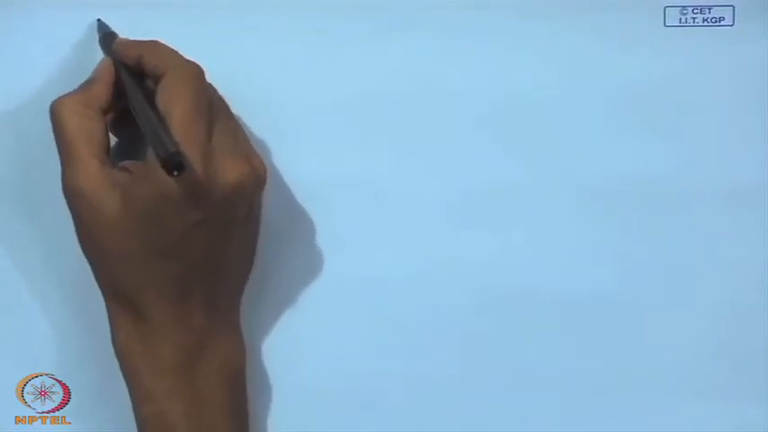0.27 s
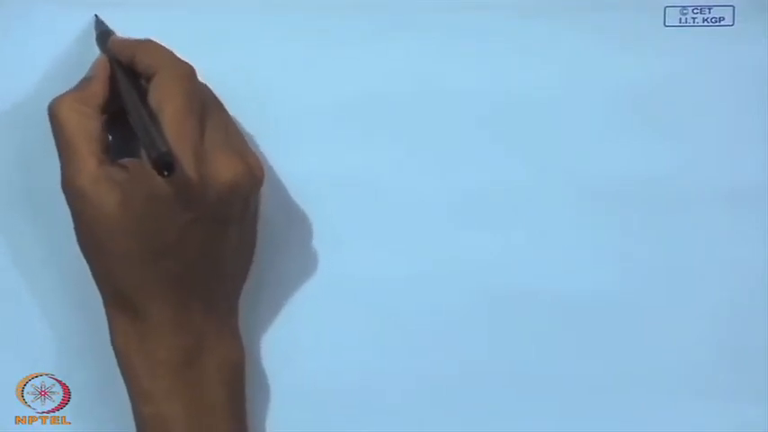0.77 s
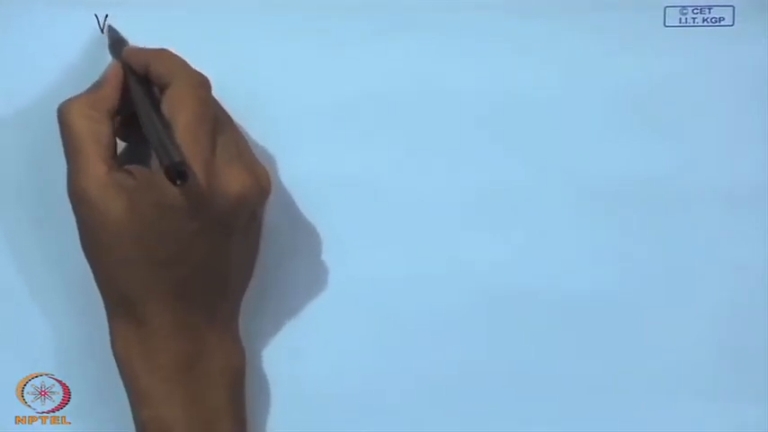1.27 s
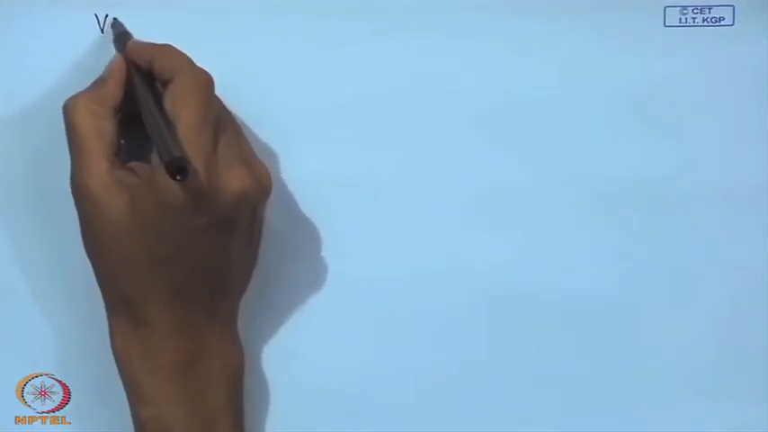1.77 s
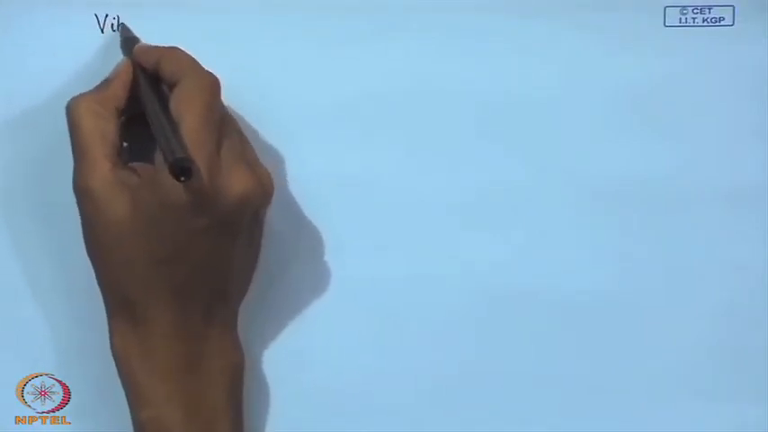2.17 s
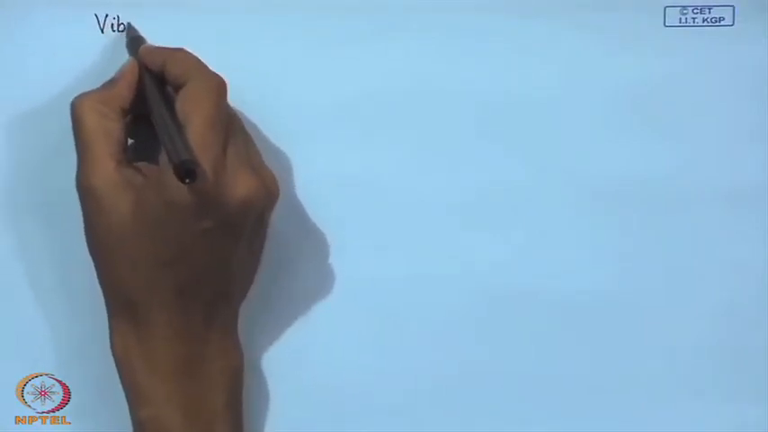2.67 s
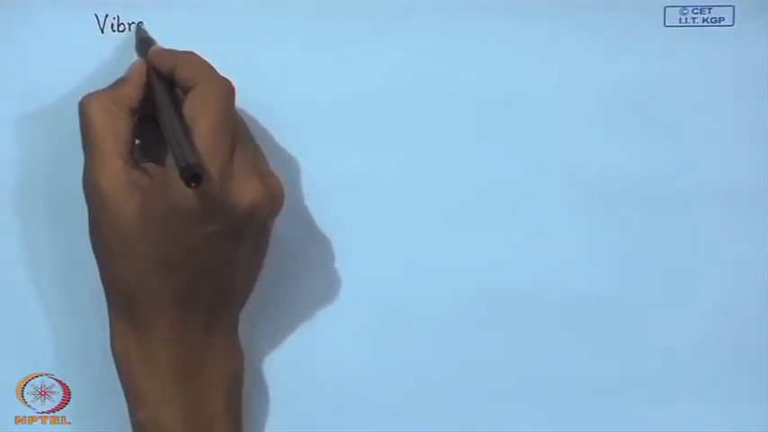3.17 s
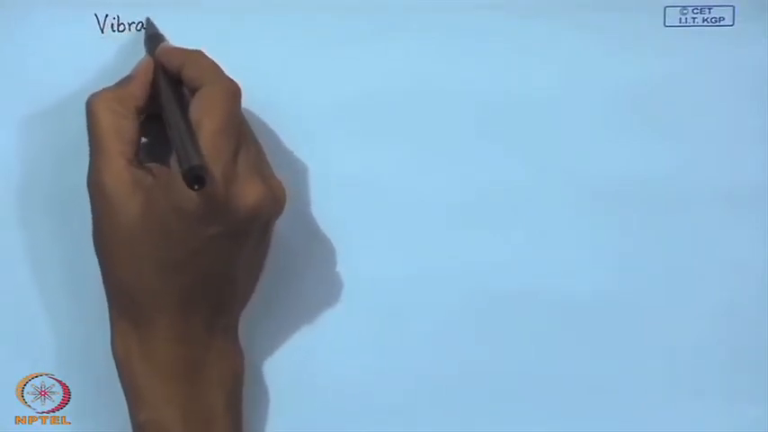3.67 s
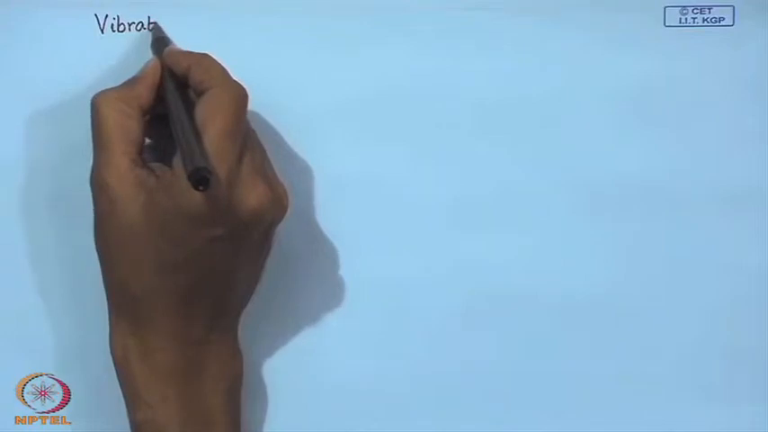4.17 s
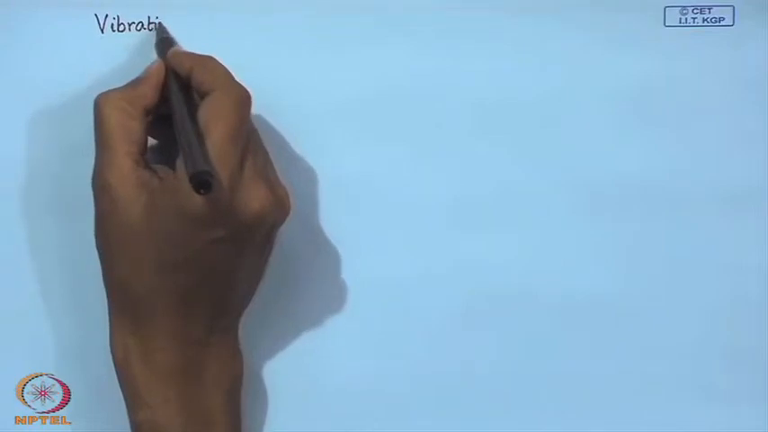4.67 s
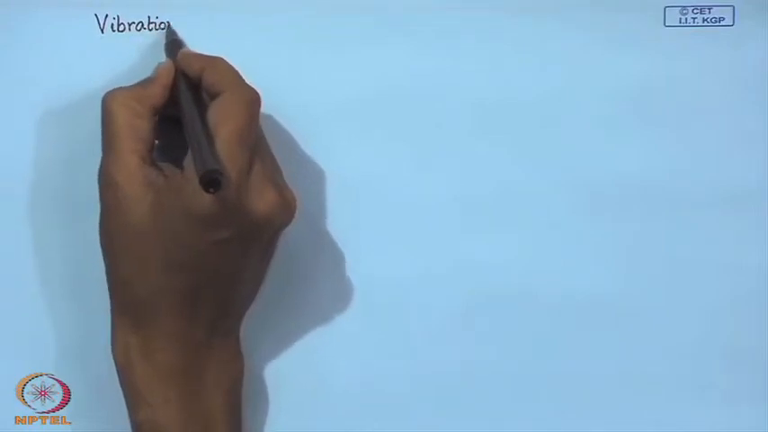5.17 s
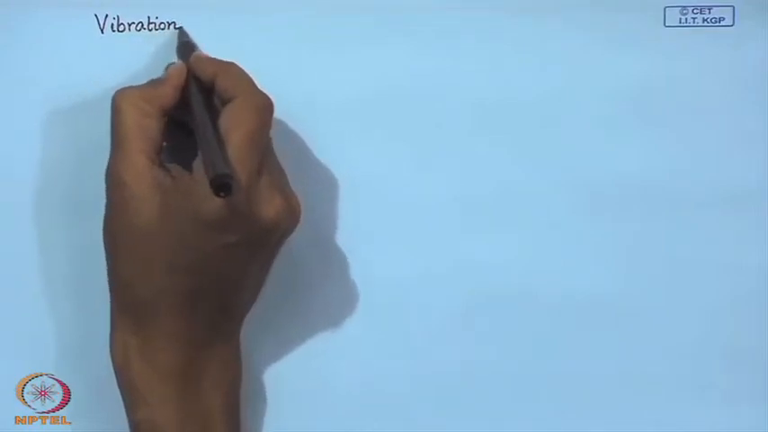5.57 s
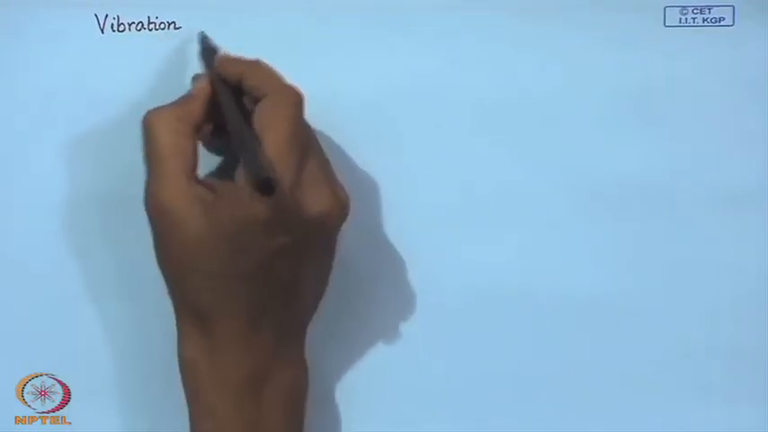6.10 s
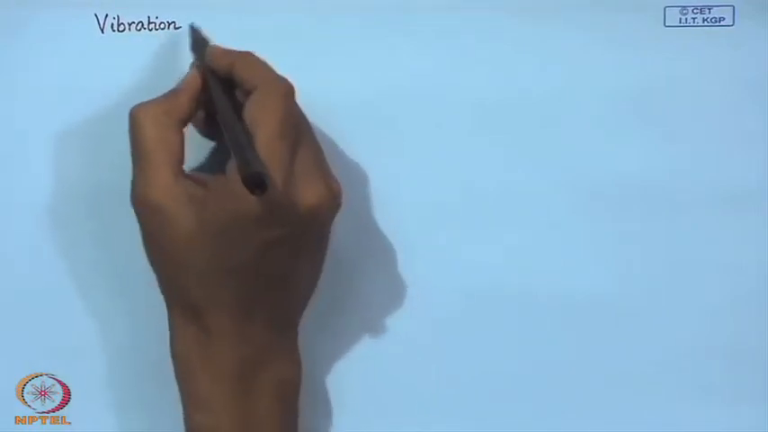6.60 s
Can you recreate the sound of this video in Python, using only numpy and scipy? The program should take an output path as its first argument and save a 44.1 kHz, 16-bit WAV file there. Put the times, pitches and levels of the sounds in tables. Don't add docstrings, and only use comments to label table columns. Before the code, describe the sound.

Quiet room with heavy low ventilation rumble; soft dry pen strokes whisper on a sheet, then the hand rustles and the paper snaps.

```python
import sys
import numpy as np
from scipy import signal
from scipy.fft import rfft, irfft
from scipy.io import wavfile
from scipy.ndimage import uniform_filter1d

SR = 44100
rng = np.random.default_rng(int(sys.argv[2]) if len(sys.argv) > 2 else 0)


def to_wav(sig):
    pcm = np.clip(np.atleast_2d(sig), -1, 1) * 32767
    pcm = np.round(pcm).astype(np.int16)
    wavfile.write(sys.argv[1], SR, pcm.T)


def how_loud(loudness_db):
    steps = np.asarray(loudness_db, float) / 20
    return 10 ** steps


N = 301644

# f/Hz, density/dB
AIR_SPECTRUM = [(60, 0), (72, -5), (86, -17), (110, -23.5), (130, -30.5), (250, -28), (340, -37.5),
                (460, -36), (700, -43), (900, -67)]
# f/Hz, width/Hz, level/dB
DUCT_MODES = [(81.6, 11.3, -61.5), (120.8, 7.3, -66.5), (167.1, 11, -66), (195.9, 10, -69.5),
              (307, 20, -73), (448.4, 25, -75.5), (512, 24, -87), (676, 13, -86), (864, 9.6, -89.5),
              (979, 12, -86.5), (1220, 180, -82.5)]
# t/s, level/dB
THROB = [(0, -32.5), (0.28, -29), (0.78, -35), (1.1, -26.5), (1.39, -39), (1.58, -27), (1.79, -26.5),
         (2.15, -34.5), (2.5, -24.5), (2.86, -31), (3.27, -24.5), (3.56, -38), (3.71, -31), (4.48, -39),
         (4.7, -30.5), (5.9, -33), (6.55, -38), (6.84, -35)]
# f/Hz, width/Hz
RUMBLE_MODES = [
    (37, 8.53),
    (58.5, 6.9),
]
# t/s, level/dB
GUSTS_SECOND = [(0.0, -28.5), (0.39, -29), (1.12, -28.5), (1.81, -30.5), (2.21, -31), (2.42, -29.5),
                (2.75, -40.5), (3.1, -30.5), (3.45, -33.5), (3.8, -31), (4.04, -32), (4.23, -32),
                (4.46, -28.5), (4.8, -31.5), (5.11, -29.5), (5.58, -32.5), (5.95, -31.5), (6.13, -30.5),
                (6.65, -33.5)]
# t/s, level/dB
GUSTS_THIRD = [(0.3, -40.5), (0.88, -38), (1.27, -38), (1.69, -38), (2.02, -39), (2.42, -36), (2.8, -43.5),
               (3.2, -41), (3.73, -37), (4.0, -38), (4.3, -37.5), (4.5, -47), (5.03, -40.5), (5.36, -38),
               (5.92, -46), (6.27, -36.5), (6.62, -35)]
# t/s, level/dB, hold/s, f/Hz, glide/(Hz per s)
SQUEAKS = [
    (1.535, -69.5, .032, 1455, 300),
    (1.68, -73.5, .022, 1450, -100),
    (1.562, -72, 0.074, 1270, 600.5),
    (1.752, -78, .008, 1710, 900),
    (3.72, -82, .04, 2038, 30),
    (3.9, -86, .04, 2025, 30.5),
]
# t/s, peak level/dB, crack f/Hz, thump re crack/dB
SNAPS = [(1.111, -57, 7000, -17), (1.1365, -61, 7000, -14), (1.7544, -64, 6000, -8),
         (5.5344, -53, 9800, -12), (5.5495, -52, 11300, -14), (5.697, -55, 8200, -14),
         (5.718, -54, 4000, -18), (5.7235, -55, 6500, -1), (5.7284, -39, 13000, -18),
         (5.7345, -39.5, 8500, -21), (5.8117, -63, 9000, -8), (5.9958, -55, 11000, -18),
         (6.2188, -49, 5000, -19), (6.4794, -65, 9000, -8), (6.6925, -58, 5200, -12)]
# t/s, level/dB, rise/s, fall/s, hold/s
SLIDES = [
    (5.716, -63, 0.081, .03, 0.0039),
    (5.726, -55.5, .02, .004, 0.0083),
    (5.74, -72, .02, .11, .066),
    (6.214, -71.5, .11, .05, 0.0053),
    (6.23, -77, .2, .13, 0.042),
    (6.544, -78, .035, .045, 0),
    (6.69, -86, 0.14, .17, 0),
]
# f/Hz, density/dB
RUSTLE_SPECTRUM = [(900, -22), (1300, -1), (1700, -8), (2200, -14), (4000, -9), (7200, -8.5), (9300, -8),
                   (11000, -5.5), (13600, -11), (15200, -9), (16000, -9)]
# t/s, level/dB, rise/s, fall/s, lean/dB (more barrel when the pen lies flatter)
FLICKS = [(0.845, -66, 0.04, 0.091, 4), (1.199, -71.5, .03, .02, -1.5), (1.43, -70, 0.024, .05, .6),
          (1.623, -69.5, .028, 0.042, -2.5), (2.182, -65, .06, 0.078, -1), (2.694, -70.5, .025, 0.07, 1),
          (3.102, -78.5, 0.033, .12, .6), (3.482, -75, .018, .06, -1), (3.538, -70.5, .022, 0.03, -3.5),
          (3.804, -67, 0.053, .08, 3), (4.114, -61, 0.023, 0.022, -0.5), (4.298, -73.5, 0.053, .045, 3),
          (4.372, -65, .018, 0.014, -1.5), (4.576, -66, 0.011, 0.01, -2.5), (4.901, -63.5, 0.083, 0.047, 2),
          (4.961, -68.5, .03, 0.019, -3), (5.461, -76, 0.066, .06, 1.5), (1.106, -66, .05, 0.048, -0.5),
          (3.32, -71.5, .015, 0.18, 0)]
# t/s, level/dB, rise/s, fall/s, hold/s
LOOPS = [(1.036, -60.5, .02, 0.056, .036), (1.53, -71, 0.026, .047, .02), (1.977, -62, 0.019, 0.044, 0.027),
         (2.326, -66, 0.077, .022, 0.036), (2.801, -67, .021, .04, .052), (3.197, -65, 0.022, 0.049, 0.049),
         (3.359, -67, .04, .025, .028), (3.915, -68.5, 0.038, 0.021, 0.023), (4.772, -73, .02, .08, .025),
         (5.173, -75.5, .025, 0.023, .03), (5.336, -70, 0.052, .026, .052),
         (5.539, -61.5, .009, 0.031, 0.017)]
# t/s, desk level/dB, rise/s, fall/s
PRESSES = [
    (0.88, -67.5, .15, 0.22),
    (1.1, -74, .15, .15),
    (2.35, -70, .15, .1),
    (2.82, -67, .12, 0.17),
    (3.29, -73, .2, .2),
    (3.85, -67.5, .15, .08),
    (4.3, -71, .1, .15),
    (4.94, -70, .1, .1),
    (5.46, -72, .1, .1),
    (5.538, -72, .02, .08),
]
# f/Hz, width/Hz, level/dB
BARREL_LOW = [(3020, 1350, -4), (4190, 600, -8), (5040, 770, -0.5), (5960, 930, -2.5), (6990, 690, -4.5),
              (8340, 1470, -2)]
# f/Hz, width/Hz, level/dB
BARREL_HIGH = [(8710, 760, -6), (9690, 910, 0), (11010, 460, 0), (11720, 640, 0)]
# f/Hz, width/Hz, level/dB
TIP_MODES = [(13250, 1100, 3), (14700, 840, -11), (15700, 1200, -19)]
# f/Hz, width/Hz, level/dB
DESK_MODES = [(1238, 160, 4.5), (1377, 350, -13.5), (1099, 120, 5), (1650, 730, -12)]
# f/Hz, density/dB
HISS_SPECTRUM = [(500, 4.5), (800, 5.5), (1000, 1.5), (1300, -3), (1600, -8), (2000, -9), (2500, -14.5),
                 (3200, -14), (4000, -23.5), (5000, -20.5), (6300, -42), (10000, -20.5), (14500, -28.5),
                 (16000, -29)]
# f/Hz, level/dB
HUM = [(100, -57.5), (247.6, -74), (585, -80.5), (12096, -100), (14416, -101)]

SWELL_DB = 20
GRIP_DB = 1.5


def unit_power(x):
    return x / np.sqrt(np.mean(x ** 2) + 1e-20)


def colour(x, spectrum, low_hz):
    hz = np.arange(N // 2 + 1) * SR / N + 1e-3
    spectrum_hz, spectrum_db = np.transpose(spectrum)
    db = np.interp(np.log(hz), np.log(spectrum_hz), spectrum_db)
    low_cut = 1 + (low_hz / hz) ** 12
    return unit_power(irfft(rfft(x) * how_loud(db) / low_cut, N))


def resonate(x, hz, width_hz):
    r = np.exp(-np.pi * width_hz / SR)
    feed = (1 - r * r) / 2 * np.array([1, 0, -1])
    return signal.lfilter(feed, [1, -2 * r * np.cos(2 * np.pi * hz / SR), r * r], x)


def resonate_steep(x, hz, width_hz):
    return resonate(resonate(x, hz, width_hz), hz, width_hz)


def drift(rate_hz):
    knots = rng.standard_normal(round(N / SR * 40) + 2)
    r = np.exp(-2 * np.pi * rate_hz / 40)
    slow = unit_power(signal.lfilter([1], [1, -r], knots))
    return np.interp(np.arange(N) / SR * 40, np.arange(len(slow)), slow)


def body(x, modes):
    rings = [how_loud(db) * unit_power(resonate_steep(x, hz, width)) * np.sqrt(width)
             for hz, width, db in modes]
    total = np.sqrt(sum(np.mean(ring ** 2) for ring in rings))
    return sum((-1) ** k * how_loud(GRIP_DB * drift(4)) * ring for k, ring in enumerate(rings)) / total


def grains(per_s, spread_db):
    sizes = how_loud(spread_db * np.minimum(rng.exponential(1, N), 5)) * rng.choice([-1, 1], N)
    return sizes * (rng.random(N) < per_s / SR)


def tone(hz):
    phase = 2 * np.pi * np.cumsum(hz * np.ones(N)) / SR
    return np.sqrt(2) * np.sin(phase + rng.uniform(0, 2 * np.pi))


def fine(per_ms):
    return np.interp(np.arange(N) / SR * 1000, np.arange(len(per_ms)), per_ms)


def swell(s, db, rise, fall, hold=0):
    t = np.arange(0, N / SR + 1, 1e-3) - s
    return db - SWELL_DB * np.maximum(np.maximum(-t / rise, (t - hold) / fall), 0)


def loudest(rows):
    return fine(np.max([swell(*row) for row in rows], axis=0))


def air():
    sway = how_loud(-40) * unit_power(resonate_steep(rng.standard_normal(N), 17, 7))
    rush_db = -51 + 1.64 * drift(4.7)
    rush = how_loud(rush_db) * colour(rng.standard_normal(N), AIR_SPECTRUM, low_hz=64.8)
    ducts = sum(how_loud(db) * unit_power(resonate(rng.standard_normal(N), hz, width))
                for hz, width, db in DUCT_MODES)
    return rush + ducts + sway


def room_modes():
    throb_hz, wander_hz = 27.8, 0.59
    gust_rise_s, gust_fall_s = 0.43, 0.48
    throb_s, throb_db = np.transpose(THROB)
    throb_level_db = np.interp(np.arange(N) / SR, throb_s, throb_db)
    out = how_loud(throb_level_db) * tone(throb_hz + wander_hz * drift(2.36))
    for (hz, width_hz), gusts in zip(RUMBLE_MODES, [GUSTS_SECOND, GUSTS_THIRD]):
        mode = resonate_steep(rng.standard_normal(N), hz, width_hz)
        power = uniform_filter1d(uniform_filter1d(mode ** 2, size=5000), size=5000)
        gust_db = loudest([(s, db, gust_rise_s, gust_fall_s) for s, db in gusts])
        out = out + how_loud(gust_db) * mode / np.sqrt(power)
    return out


def squeaks():
    rise_s, fall_s = 0.035, 0.035
    rough = 1 + 0.45 * unit_power(resonate(rng.standard_normal(N), 40, 65))
    t = np.arange(N) / SR
    tones = 0
    for s, db, hold, hz, glide in SQUEAKS:
        level_db = fine(swell(s, db, rise_s, fall_s, hold))
        tones = tones + how_loud(level_db) * tone(hz + glide * (t - s))
    return rough * tones


def snaps():
    out, t = np.zeros(N + 1000), np.arange(1000) / SR
    knock = np.sin(2 * np.pi * 1580 * t) + 0.64 * np.sin(2 * np.pi * 1250 * t)
    thump = knock * 2.5 * (t / .002) * np.exp(-t / .002)
    for s, db, hz, thump_db in SNAPS:
        burst = rng.standard_normal(1000) * np.exp(-t / .00015)
        burst[12:] += .7 * burst[:-12]
        crack = .5 * np.diff(burst, prepend=0) + resonate(burst, hz, 3500) * 1.5
        snap = crack / np.abs(crack).max() + how_loud(thump_db) * thump
        out[round(s * SR):][:1000] += how_loud(db) * snap
    return out[:N]


def hand():
    return how_loud(loudest(SLIDES)) * colour(grains(6800, spread_db=2.5), RUSTLE_SPECTRUM, low_hz=1194.6)


def pen():
    low_db, tip_db = -6.5, -7.5
    low_follows, desk_follows = 0.83, 0.34
    press_db, desk_usual_db = -67, -73
    catch_db = 1.3
    level_db = loudest([row[:4] for row in FLICKS] + LOOPS)
    leaning_db = loudest([(s, db + lean, rise, fall) for s, db, rise, fall, lean in FLICKS] + LOOPS)
    slips = grains(7500, spread_db=3.3) * how_loud(catch_db * drift(15))
    high_power = np.clip(1 - how_loud(2 * low_db) - how_loud(2 * tip_db), .1, 1)
    high = body(slips, BARREL_HIGH) * np.sqrt(high_power)
    low_level_db = low_db + press_db + low_follows * (leaning_db - press_db)
    low = how_loud(low_level_db) * body(slips, BARREL_LOW)
    tip = how_loud(tip_db) * body(slips, TIP_MODES)
    stroke_desk_db = desk_usual_db + desk_follows * (level_db - press_db)
    desk_db = np.maximum(stroke_desk_db, loudest(PRESSES))
    return how_loud(level_db) * (high + tip) + low + how_loud(desk_db) * body(slips, DESK_MODES)


def scene():
    background = air() + room_modes() + squeaks()
    return (background + snaps() + hand() + pen())[None]


def band_limit(x):
    return signal.sosfilt(signal.butter(12, 15760, fs=SR, output="sos"), x)


def record(dry):
    hiss = how_loud(-73.5) * colour(rng.standard_normal(N), HISS_SPECTRUM, low_hz=696)
    bump = how_loud(-93) * unit_power(resonate_steep(rng.standard_normal(N), 11290, 260))
    hum = sum(how_loud(db + 1.7 * drift(3.5)) * tone(hz + 0.89 * drift(5)) for hz, db in HUM)
    whine = how_loud(-63) * dry * tone(3900.3)
    wide = dry + hiss + bump + hum + whine
    edge = signal.sosfiltfilt(signal.butter(14, 15200, "high", fs=SR, output="sos"), wide)
    edge_db = 10 * np.log10(uniform_filter1d(edge ** 2, size=2048) / np.median(edge ** 2))
    patches = np.clip(6 * drift(4) + 1, 0, 1)
    faint = np.clip(6.5 - edge_db, 0, 1)
    wide = wide - edge * patches * faint
    mix = signal.sosfilt(signal.ellip(12, .3, 60, 15750, fs=SR, output="sos"), wide)
    return band_limit(mix)


dry = scene()
out = record(dry)
to_wav(out)
```